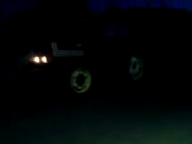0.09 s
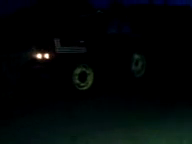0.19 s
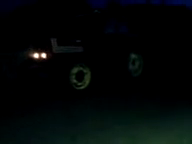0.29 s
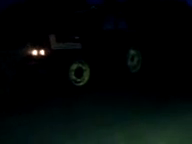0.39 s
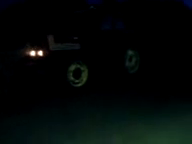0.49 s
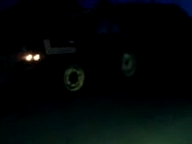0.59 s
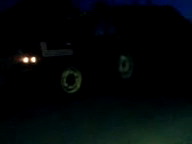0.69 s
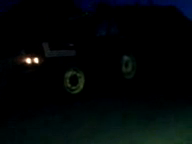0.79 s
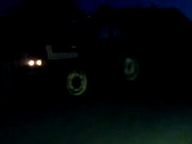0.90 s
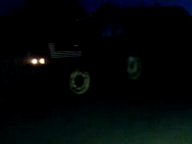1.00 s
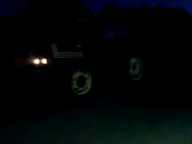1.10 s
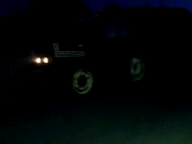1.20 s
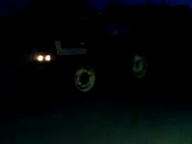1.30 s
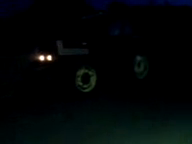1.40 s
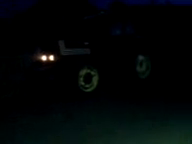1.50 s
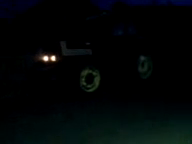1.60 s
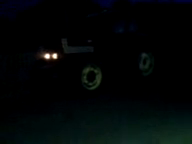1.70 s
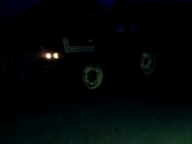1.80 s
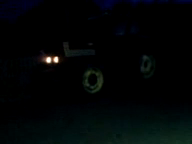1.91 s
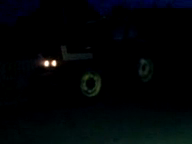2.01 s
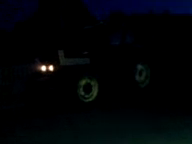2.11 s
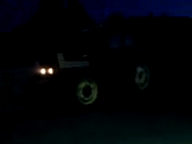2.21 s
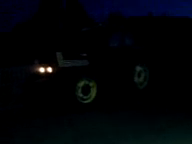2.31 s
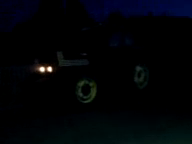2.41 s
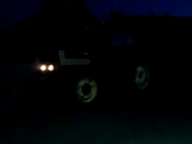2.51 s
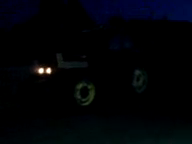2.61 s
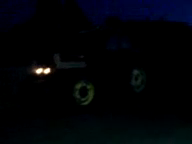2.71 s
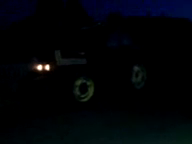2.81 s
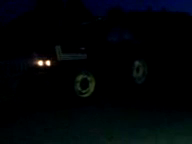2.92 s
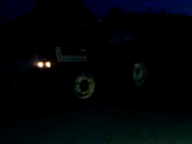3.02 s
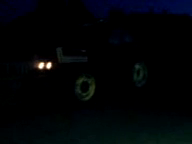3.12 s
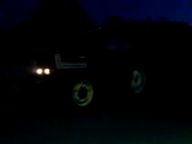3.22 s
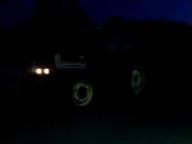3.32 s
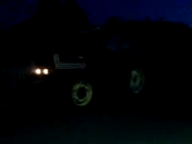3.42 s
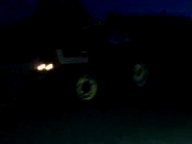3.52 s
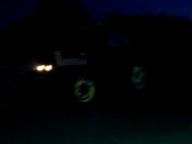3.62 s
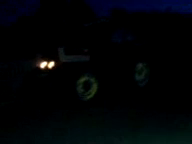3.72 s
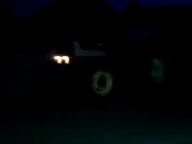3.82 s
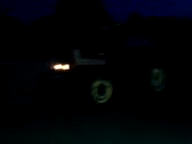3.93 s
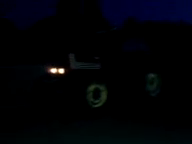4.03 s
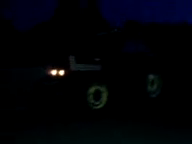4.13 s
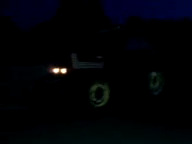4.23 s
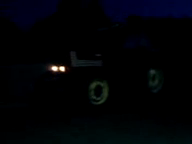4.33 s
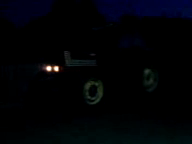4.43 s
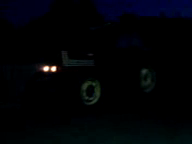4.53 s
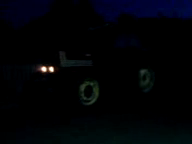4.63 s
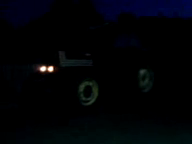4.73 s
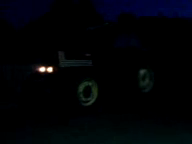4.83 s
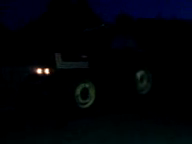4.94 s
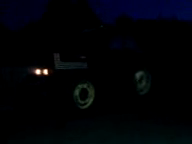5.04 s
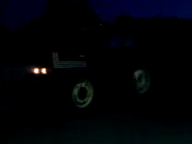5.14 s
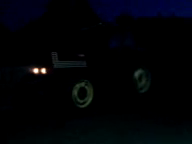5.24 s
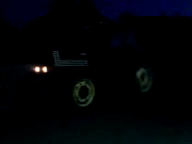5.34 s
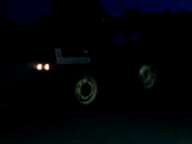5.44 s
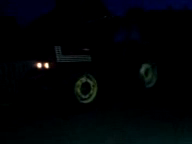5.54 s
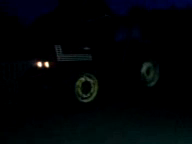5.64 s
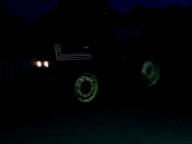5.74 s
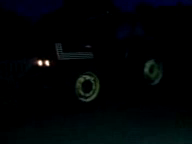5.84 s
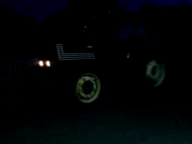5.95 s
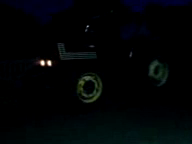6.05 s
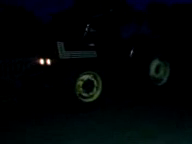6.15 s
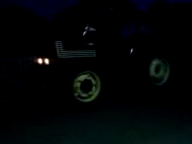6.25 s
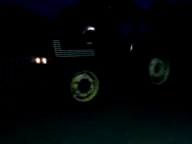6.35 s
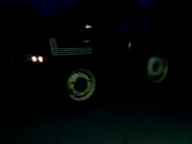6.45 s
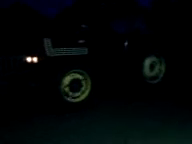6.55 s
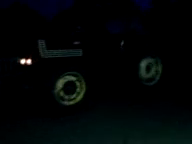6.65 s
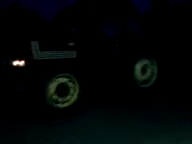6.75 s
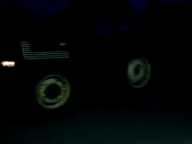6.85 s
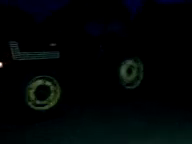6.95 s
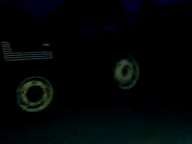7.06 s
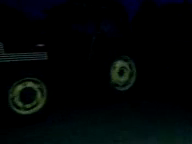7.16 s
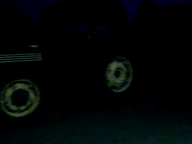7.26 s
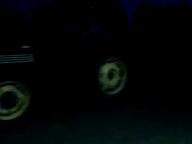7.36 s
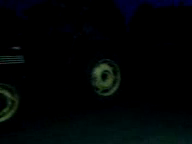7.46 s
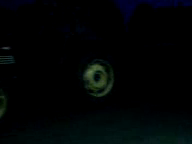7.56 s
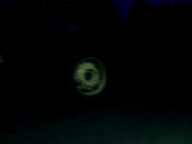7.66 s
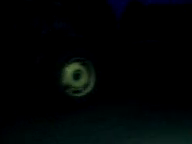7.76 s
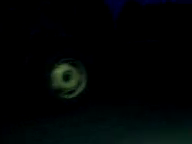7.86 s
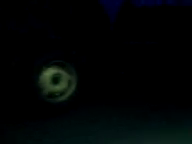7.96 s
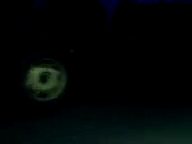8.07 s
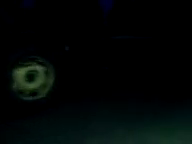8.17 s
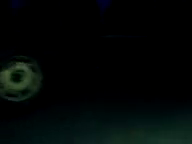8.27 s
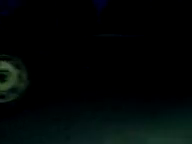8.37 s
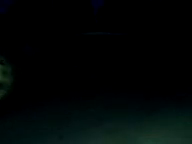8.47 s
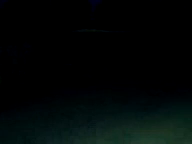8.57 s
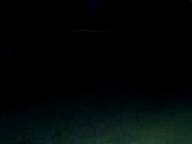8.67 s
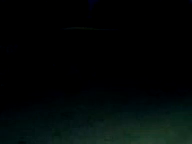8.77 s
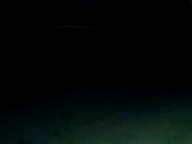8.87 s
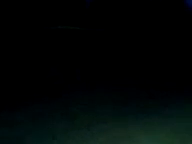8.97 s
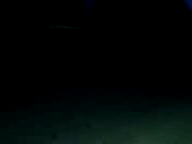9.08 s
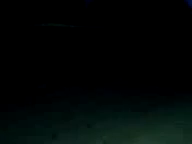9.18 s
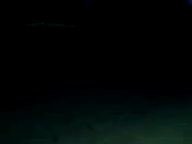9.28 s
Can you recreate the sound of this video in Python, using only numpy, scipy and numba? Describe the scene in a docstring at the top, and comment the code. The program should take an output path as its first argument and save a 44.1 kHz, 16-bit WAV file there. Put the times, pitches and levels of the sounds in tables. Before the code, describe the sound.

Two abrupt dog barks with dull wall echoes open over the lumpy, clattering idle of a six-cylinder diesel tractor a few metres away. A hard lever clunk comes, the revs lift slightly, and one more bark follows. Then the engine speeds up and the tractor drives close past, clatter and tyre rumble swelling. Outdoor night yard, cheap narrow-band microphone, distorting on loud peaks.

```python
"""In a yard at night, a six-cylinder diesel tractor idles, raises its revs and drives close past the microphone.
Noise bursts at the firing rate, coloured by resonances, give its exhaust and clatter; damped rings give its knocks.
A dog, heard as a rough-edged swept tone, barks twice at first and once later, and walls answer.
A lever clunks in decaying modes as the throttle opens; pump tones, tyre noise and gearbox ring join.
The microphone passes little above 3.9 kHz and clips whatever is loud."""
import sys
import numpy as np
from scipy import signal
from scipy.fft import rfft, irfft
from scipy.io import wavfile
from scipy.ndimage import uniform_filter1d
from numba import njit

SR = 44100
rng = np.random.default_rng(int(sys.argv[2]) if len(sys.argv) > 2 else 0)


def materialize(psi):
    """Save the field psi as 16-bit PCM at rate SR to the path in sys.argv[1].

    A 1-D psi becomes a single channel; in a 2-D psi each row is a channel.
    """
    bounded = np.clip(np.atleast_2d(psi).T, -1, 1)
    quanta = np.round(bounded * 32767).astype(np.int16)
    wavfile.write(sys.argv[1], SR, quanta)


N = 411894

# barks: t/s when the voice clears, run-up/s, held/s, top f/Hz, sag of pitch at both ends (0-1),
# level/dB, roughness of the break, octave level/dB
BARKS = [(-.09, .03, 0.1, 699.5, 0.16, -4, 0.6, -25), (.127, .05, .053, 597.7, 0.03, 6.5, 1.01, -24.5),
         (4.177, .028, .074, 632, .075, 5, .35, -14)]
# upper harmonics of the voice: multiple of the pitch, level/dB
VOICE_HARMONICS = [(3, -36.5), (4, -42)]
# colour of the rasp where the voice is rough: f/Hz, level/dB
RASP_COLOUR = [(600, -14.5), (1030, 1), (1350, -8), (1700, -4), (2700, -12)]
# wall echoes of the bark: delay/s, level/dB
ECHOES = [(.077, -8.5), (.116, -17.5), (.15, -22)]
ECHO_HZ = 1300  # the walls send back little above this
LEAD_S = 0.2  # the barks are computed from this long before the start
RUN_UP_PITCH, RUN_UP_DB, RUN_UP_ROUGH = 0.66, -10.5, 0.65  # share of the top pitch, dB, 0-1
RUN_UP_CURVE = 1.6  # above 1, the voice tightens slowly at first and then quickly
BREAK_S, BREAK_PITCH, BREAK_DB = 0.018, 0.9, -11.5  # s, share of the arched pitch, dB
BARK_ATTACK_S, BARK_RELEASE_S = 0.02, 0.014

# engine speed: t/s, four-stroke cycles per second
ENGINE_SPEED = [(0, 5.666), (3.8, 5.666), (4.0, 6.14), (5.2, 6.08), (5.9, 5.97), (6.25, 6.0), (6.6, 7.4),
                (7.0, 8.62), (7.6, 8.5), (8.2, 8.64), (9.34, 9.0)]
# distance of the engine: t/s, distance/m
DISTANCE = [(0, 6.86), (5.4, 6.25), (6.2, 5.6), (6.8, 3.2), (7.5, 3.13), (8.2, 2.54), (9.34, 2.96)]
# cylinders in firing order: place of the knock in the cycle (0-1), ring f/Hz,
# knock level/dB at idle, knock level/dB with the throttle open, firing level/dB
CYLINDERS = [(.08, 1174, -13, 1, -1), (.255, 1280, 9, -0.5, -3.5), (.428, 1290, 5.5, 2.5, -3),
             (0.599, 673, -5.5, -6, -9.5), (.735, 640, -4.5, -3, -5.5), (.878, 1450, 7.5, 3, -11)]
# exhaust thump at idle, then with the throttle open: place in the cycle (0-1), ring f/Hz, level/dB
THUMP = [(.256, 305, 0.5), (0.409, 333, 2.5)]
# spectra of exhaust, cab panels, engine block and valve gear: f/Hz, level/dB
EXHAUST_COLOUR = [(20, -38.5), (40, -23.5), (65, -13), (130, -12), (200, -9), (260, -3.5), (320, 3),
                  (400, -2), (480, -3.5), (620, -21.5)]
PANEL_COLOUR = [(380, -24.5), (520, -5), (660, -0.5), (750, 0.5), (820, 2.5), (900, 1), (1060, 5.5),
                (1170, 3.5), (1400, -25)]
BLOCK_COLOUR = [(950, -34.5), (1170, -13), (1320, -2.5), (1460, -3), (1600, -5.5), (1750, -7.5),
                (2100, -12)]
VALVE_COLOUR = [(1450, -20.5), (1780, -5.5), (2150, 1), (2650, 1), (3000, -2.5), (3350, -6.5), (3700, -20),
                (4200, -21.5), (4800, -30)]
# moving resonance of the valve cover: t/s, f/Hz
COVER_RING = [(1.6, 2590), (2.3, 2250), (4.6, 1980), (7.4, 2200), (8.5, 2006), (9, 2546)]
# prominence of the firings as the open engine side turns to the microphone: t/s, level/dB
BITE = [(0, -0.5), (4.7, 5), (5.4, 3), (6.2, 4.5), (6.7, -2), (9.34, -2)]
# treble, which dips late in the idle and swells as the tractor comes alongside: t/s, level/dB
TREBLE = [(0, -1), (1.5, -1), (2.4, -2.5), (2.8, -6.5), (3.65, -8.5), (3.9, -2), (4.9, -1.5), (5.6, 0),
          (8.25, 1), (8.28, 6.5), (8.65, 6), (8.95, 10), (9.34, 9.5)]
BLOCK_DIP_SHARE, BLOCK_SWELL_SHARE = 1, 0.49  # shares of the treble's dip and swell in the block
THROTTLE_S, THROTTLE_RISE_S = 3.74, 0.11  # the throttle starts to open, and takes this long
# the stack and cab panels stand above the microphone, so they never come as near
STACK_HEIGHT_M, PANEL_HEIGHT_M = 1.72, 4.7
# base levels for a path of 1 m, in dB: (at idle, with the throttle open)
EXHAUST_DB, PANEL_DB = (-12, -10), (-8.5, -3.5)
BLOCK_DB, VALVE_DB = (-5, -5.5), (-6.5, -6)
KNOCKS_DB = -20.5  # base level of knocks and thumps for a path of 1 m
KNOCK_S, KNOCK_WIDTH_HZ, THUMP_WIDTH_HZ = 0.006, 68, 35  # decay constant, base widths of the rings
OVERTONE_RATIO, OVERTONE_DB = 1.52, (-10.5, -3.5)  # overtone of a knock, dB at idle and open
FIRING_PLACE = (0.035, -0.08)  # first firing in the cycle, at idle and open
THROB_DB, THROB_PLACE = 1.5, 0.91  # idle throb twice a cycle: peak, place of a crest (0-1)
PULL_DB, PULL_S = 1.0, 0.97  # dB per (cycle per second squared), averaging window in s

# pump whine and lower hum: t/s, level/dB; the hum sinks during the idle and returns at higher revs
PUMP_WHINE = [(0, -52), (2, -49), (2.8, -33.5), (3.6, -39.5), (4.1, -33), (4.9, -32), (5.8, -52.5)]
HUM = [(0, -37.5), (3.7, -52), (4.6, -36), (5.999, -38), (7.2, -34.5), (8, -52)]
WHINE_HZ, HUM_HZ = 815, 442
# rear tyre rolling up to the microphone: t/s, level/dB
TYRE = [(0, -77.5), (6, -45), (6.7, -35), (7.8, -31.5), (8.25, -23.5), (8.29, -18), (8.7, -16),
        (9.34, -11.5)]
# spectrum of the tread: f/Hz, level/dB
TREAD_COLOUR = [(25, -17), (70, -12), (160, -6.5), (330, -5), (540, 2), (660, 0.5), (900, -3), (1150, -11)]
# single engine knocks that stand out: t/s, ring f/Hz, level/dB
SINGLE_KNOCKS = [(.686, 1482, -14.5), (0.863, 1483, -16.5), (1.392, 1454, -15), (1.977, 1252, -12),
                 (4.925, 1523, -16), (6.008, 1407, -12.5), (6.015, 1930, -18.5)]
# modes of the lever clunk: f/Hz, level/dB, t60/s
CLUNK_MODES = [(276, -5, .04), (500, 5, 0.011), (796, -1, 0.0091), (1360, -9.5, 0.017), (2400, -8.5, 0.012),
               (3560, -9, 0.026)]
CLUNK_S = 3.758
GEARBOX_HZ, GEARBOX_WIDTH_HZ = 1463.4, 70
GEARBOX_DB = -11  # base level for a path of 1 m
DRIVE_SPEEDS = (6.2, 8.5)  # cycles per second between which the drive takes hold
CLIP_LEVEL, TOP_HZ = 0.8, 15900  # full scale is 1; upper edge of the output band


def undb(db):
    """Level law: decibels to amplitude gain."""
    return 10 ** (np.asarray(db) / 20)


def unit(x):
    """Normalisation of a signal to an rms of 1."""
    return x / np.sqrt(np.mean(x ** 2) + 1e-18)


def curves(rows):
    """Linear interpolation in time of each column of a table."""
    times, *columns = np.transpose(rows)
    return [np.interp(np.arange(N) / SR, times, column) for column in columns]


def colour(x, points):
    """Spectral shaping through given points, with steep skirts beyond the ends."""
    hz, db = np.transpose(points)
    log_f = np.log(np.maximum(np.arange(N // 2 + 1) * SR / N, 1))
    below = np.maximum(np.log(hz[0]) - log_f, 0)
    above = np.maximum(log_f - np.log(hz[-1]), 0)
    gain_db = np.interp(log_f, np.log(hz), db) - 120 * (below + above)
    return irfft(rfft(x) * undb(gain_db), N)


def ring(x, hz, width_hz):
    """Simple resonance with gain 1 at its centre."""
    return signal.lfilter(*signal.iirpeak(hz, hz / width_hz, fs=SR), x)


def damped_mode(hz, age, t60):
    """Free vibration of one mode, its amplitude falling 60 dB in t60 seconds."""
    return np.sin(2 * np.pi * hz * age) * np.exp(-np.log(1000) * age / t60)


def walk(rate):
    """Random fluctuation: normal values, `rate` a second, joined by straight lines."""
    place = np.arange(N) / SR * rate
    return np.interp(place, np.arange(20000), rng.standard_normal(20000))


def bark(t, start, run_up, held, top_hz, sag, db, break_rough, octave_db, jitter=0.075, rasp_db=-4):
    """Voiced source: a pitch runs up, holds an arch and breaks off downwards, with roughness at both ends."""
    age = t - start
    end = held + BREAK_S
    turns = [-run_up - BARK_ATTACK_S, -run_up, 0, held, end, end + BARK_RELEASE_S]
    arch = 1 - sag * np.clip(2 * age / held - 1, -1, 1) ** 2
    slack = 1 - np.clip(1 + age / run_up, 0, 1) ** RUN_UP_CURVE
    tightening = 1 - (1 - RUN_UP_PITCH) * slack
    hz = top_hz * arch * tightening * np.interp(age, [held, end], [1, BREAK_PITCH])
    level_db = db + RUN_UP_DB * slack + np.interp(age, [held, end], [0, BREAK_DB])
    size = undb(level_db) * np.interp(age, turns, [0, 1, 1, 1, 1, 0]) ** 2
    rough_turns = [-run_up / 3, 0, held - BREAK_S / 4, held + BREAK_S / 2]
    rough = np.interp(age, rough_turns, [RUN_UP_ROUGH, 0, 0, break_rough])

    phase = 2 * np.pi * np.cumsum(hz * (1 + jitter * rough * walk(400))) / SR
    voice = np.sin(phase)
    for multiple, part_db in VOICE_HARMONICS:
        voice += undb(part_db) * np.sin(round(multiple) * phase)
    voice += (undb(octave_db) + 0.5 * rough) * np.sin(2 * phase)  # a pressed throat lifts the octave
    voice *= 1 - 0.71 * rough ** 2  # the tone gives way to rasp
    rasp = unit(colour(rng.standard_normal(N), RASP_COLOUR)) * (1 + np.cos(phase))
    return (voice + undb(rasp_db) * rough ** 2 * rasp) * size


def dog(yard_db=-23, yard_t60=0.45):
    """Reflection: direct barks, the first already under way, dull wall echoes and a diffuse tail."""
    now = np.arange(N) / SR
    t = now - LEAD_S
    direct = sum(bark(t, *row) for row in BARKS)
    dull = signal.lfilter(*signal.butter(2, ECHO_HZ, fs=SR), direct)
    echoes = sum(undb(db) * np.interp(t - delay, t, dull, left=0) for delay, db in ECHOES)
    tail = rng.standard_normal(SR) * np.exp(-np.log(1000) * now[:SR] / yard_t60)
    diffuse = signal.fftconvolve(direct, unit(tail) / np.sqrt(SR))[:N]
    heard = direct + echoes + undb(yard_db) * diffuse
    return np.interp(now, t, heard, right=0)


def by_throttle(pair, throttle):
    """Linear blend from the idle value to the open-throttle value."""
    return pair[0] + (pair[1] - pair[0]) * throttle


def rattle(turn, same):
    """Cyclic noise: a share of the power comes back alike in every engine cycle."""
    starts = np.r_[0, np.flatnonzero(np.diff(np.floor(turn)) > 0) + 1]
    age = np.arange(N) - starts[turn.astype(int) - int(turn[0])]
    same = np.clip(same, 0, 1)
    return np.sqrt(same) * rng.standard_normal(N)[age] + np.sqrt(1 - same) * rng.standard_normal(N)


def clatter(turn, bite_db, decay, lope, scatter_db, same):
    """Amplitude modulation: six unequal decaying bursts a cycle over the steady rush of moving parts."""
    firing = len(CYLINDERS) * turn
    count = firing.astype(int)
    firing_db = np.array(CYLINDERS)[:, -1]
    chance_db = scatter_db * rng.standard_normal(size=1000)[count]
    size_db = bite_db + lope * firing_db[count % len(CYLINDERS)] + chance_db
    bursts = 1 + undb(size_db) * np.exp(-(firing % 1) / decay)
    bursts = uniform_filter1d(bursts, size=130)  # soften each onset over 3 ms
    slow_level = np.sqrt(uniform_filter1d(bursts ** 2, size=15000))  # over 0.34 s
    return bursts / slow_level * rattle(turn, same)


def strikes(turn, place, hz, width_hz, length_s, scatter_db=2.3, same=0.26):
    """Impact excitation: one blow at the same place in every cycle, part clean ring, part loose rattle."""
    t = np.arange(2000) / SR
    same = np.clip(same, 0, 1)
    swell = unit(np.sqrt(t) * np.exp(-t / length_s))
    clean = np.sqrt(2 * same) * np.sin(2 * np.pi * hz * t)
    blows = np.zeros(N + len(t))
    starts = np.flatnonzero(np.diff(np.floor(turn - place)) > 0)
    for start, chance in zip(starts, rng.standard_normal((100, len(t) + 1))):
        loose = unit(ring(chance[1:], hz, 4 * width_hz))
        blow = swell * (clean + np.sqrt(1 - same) * loose)
        blows[start:start + len(t)] += blow * undb(scatter_db * chance[0])
    return unit(ring(blows[:N], hz, 2 * width_hz))


def knocks(turn, throttle):
    """Impact resonance: each cylinder rings once a cycle; the throttle shifts balance and overtone."""
    out = np.zeros(N)
    overtone = by_throttle(undb(OVERTONE_DB), throttle)
    for place, hz, idle_db, open_db, _ in CYLINDERS:
        low = strikes(turn, place, hz, KNOCK_WIDTH_HZ, KNOCK_S)
        high = strikes(turn, place, OVERTONE_RATIO * hz, 2 * KNOCK_WIDTH_HZ, KNOCK_S)
        out += by_throttle(undb([idle_db, open_db]), throttle) * (low + overtone * high)
    return out


def thump(turn, throttle, length_s=0.005):
    """Pulse resonance: one heavier exhaust beat a cycle, later and higher with the throttle open."""
    beats = [undb(db) * strikes(turn, place, hz, THUMP_WIDTH_HZ, length_s) for place, hz, db in THUMP]
    return by_throttle(beats, throttle)


@njit
def moving_ring(x, hz, width):
    """State-variable resonance whose centre moves."""
    y, band, low = np.empty(len(x)), 0., 0.
    for i in range(len(x)):
        g, damping = np.tan(np.pi * hz[i] / SR), width / hz[i]
        v = (band + g * (x[i] - low)) / (1 + g * (g + damping))
        band, low, y[i] = 2 * v - band, low + 2 * g * v, damping * v
    return y


def exhaust(fired):
    """Pulsed flow: firing bursts shaped by the exhaust's spectrum."""
    noise = clatter(fired, bite_db=0.5, decay=1.0, lope=1.0, scatter_db=0.1, same=0.19)
    return unit(colour(noise, EXHAUST_COLOUR))


def panels(fired, bite_db):
    """Forced vibration: irregular firing bursts shaped by the cab panels' spectrum."""
    noise = clatter(fired, bite_db - 7.5, decay=0.93, lope=0.18, scatter_db=5.0, same=0.44)
    return unit(colour(noise, PANEL_COLOUR))


def block(fired, bite_db):
    """Structure-borne sound: firing bursts shaped by the engine block's spectrum."""
    noise = clatter(fired, bite_db, decay=1.0, lope=1.0, scatter_db=1.0, same=0.23)
    return unit(colour(noise, BLOCK_COLOUR))


def valves(fired, bite_db):
    """Coupled resonance: irregular gear clatter with the moving ring of the valve cover."""
    cover_hz, = curves(COVER_RING)
    gear = clatter(fired, bite_db - 4, decay=0.82, lope=0.12, scatter_db=5.0, same=0.14)
    return unit(colour(gear + 0.54 * moving_ring(gear, cover_hz, 250.0), VALVE_COLOUR))


def tractor(knock_bite=0.55, surge_db=0.94):
    """Superposition of the engine's parts, each following the throttle and the 1/r distance law."""
    (speed,), (metres,), (treble_db,), (bite_db,) = map(curves, (ENGINE_SPEED, DISTANCE, TREBLE, BITE))
    throttle = np.clip((np.arange(N) / SR - THROTTLE_S) / THROTTLE_RISE_S, 0, 1)
    turn = np.cumsum(speed) / SR
    fired = turn + 1 - by_throttle(FIRING_PLACE, throttle)
    throb_db = THROB_DB * (1 - throttle) * np.cos(4 * np.pi * (turn - THROB_PLACE))
    dip_db, swell_db = np.minimum(treble_db, 0), np.maximum(treble_db, 0)
    engine_db = BLOCK_DIP_SHARE * dip_db + BLOCK_SWELL_SHARE * swell_db
    knock_gain = undb(knock_bite * bite_db + KNOCKS_DB)
    # the exhaust is louder around a rise in engine speed
    pull = uniform_filter1d(np.maximum(np.gradient(speed) * SR, 0), size=int(PULL_S * SR))
    exhaust_db = by_throttle(EXHAUST_DB, throttle) + PULL_DB * pull
    valve_db = by_throttle(VALVE_DB, throttle) + treble_db + 0.3 * throb_db + surge_db * walk(14)

    stack = undb(exhaust_db) * exhaust(fired) + knock_gain * thump(turn, throttle)
    cab = undb(by_throttle(PANEL_DB, throttle)) * panels(fired, bite_db)
    engine = undb(by_throttle(BLOCK_DB, throttle) + throb_db) * block(fired, bite_db)
    engine = undb(engine_db) * (engine + knock_gain * knocks(turn, throttle))
    engine += undb(valve_db) * valves(fired, bite_db)
    stack_path, cab_path = np.hypot(metres, STACK_HEIGHT_M), np.hypot(metres, PANEL_HEIGHT_M)
    return engine / metres + stack / stack_path + cab / cab_path


def wavering_tone(hz, levels, waver=0.008, flutter_db=6.0):
    """Frequency and amplitude modulation: a thin tone wavers slightly and flutters in level."""
    db, = curves(levels)
    phase = 2 * np.pi * np.cumsum(hz * (1 + waver * walk(25))) / SR
    return undb(db + flutter_db * walk(12)) * np.sqrt(2) * np.sin(phase)


def pump_whine():
    """Tonal radiation: the pump's wavering pitch."""
    return wavering_tone(WHINE_HZ, PUMP_WHINE)


def hum():
    """Tonal radiation: a lower wavering pitch."""
    return wavering_tone(HUM_HZ, HUM)


def tyre(lumps_db=3):
    """Rolling noise: tread lugs meet the road in uneven lumps of shaped noise."""
    db, = curves(TYRE)
    return undb(db + lumps_db * walk(25)) * unit(colour(rng.standard_normal(N), TREAD_COLOUR))


def single_knocks(t60=0.075):
    """Free vibration: now and then an engine knock stands out and rings in a single mode."""
    t = np.arange(N) / SR
    return sum(undb(db) * damped_mode(hz, np.maximum(t - start, 0), t60) for start, hz, db in SINGLE_KNOCKS)


def lever():
    """Modal superposition: one hard blow excites well-damped modes of alternating sign."""
    age = np.maximum(np.arange(N) / SR - CLUNK_S, 0)
    out = np.zeros(N)
    for k, (hz, db, t60) in enumerate(CLUNK_MODES):
        out += (-1) ** k * undb(db) * damped_mode(hz, age, t60)
    return out


def gearbox(mesh_db=2):
    """Casing resonance: noise of meshing teeth rings the gearbox while the wheels are driven."""
    (speed,), (metres,) = curves(ENGINE_SPEED), curves(DISTANCE)
    narrow = ring(rng.standard_normal(N), GEARBOX_HZ, GEARBOX_WIDTH_HZ)
    casing = unit(ring(narrow, GEARBOX_HZ, 4 * GEARBOX_WIDTH_HZ))
    drive = np.interp(speed, DRIVE_SPEEDS, [0, 1])
    return drive * undb(GEARBOX_DB + mesh_db * walk(12)) * casing / metres


def scene():
    """Superposition of all sources at one microphone."""
    machine = tractor() + pump_whine() + hum() + tyre() + single_knocks() + gearbox()
    return (dog() + machine + lever())[None]


def record(dry):
    """Non-linear distortion: a narrow band is clipped, and the harmonics supply nearly all higher treble."""
    narrow = signal.sosfilt(signal.ellip(8, 0.2, 90, 3900, fs=SR, output="sos"), dry[0])
    clipped = np.clip(narrow, -CLIP_LEVEL, CLIP_LEVEL)
    # a gently uneven response
    toned = colour(clipped, [(10, -1.5), (4000, -1), (7800, -3.0), (9500, -1.5), (16000, -4.0)])
    return signal.sosfilt(signal.ellip(8, 0.2, 70, TOP_HZ, fs=SR, output="sos"), toned)[None]


dry = scene()
out = record(dry)
materialize(out)
```